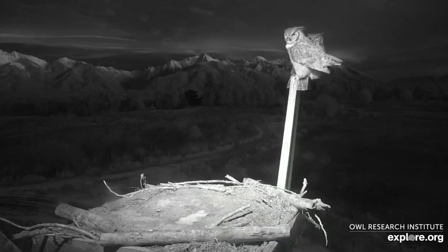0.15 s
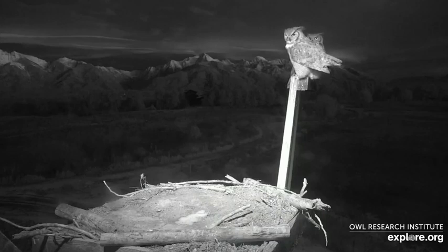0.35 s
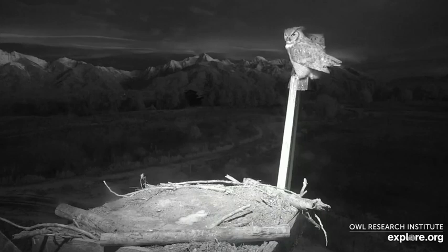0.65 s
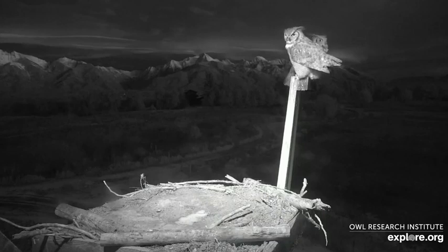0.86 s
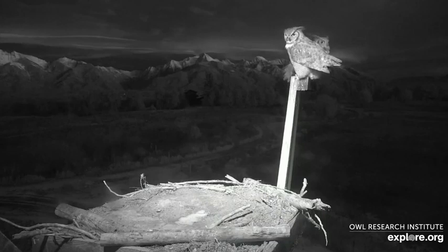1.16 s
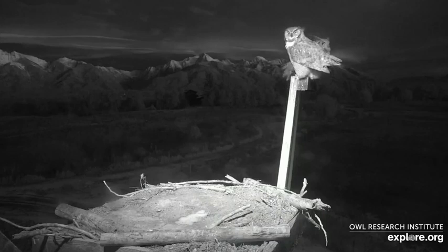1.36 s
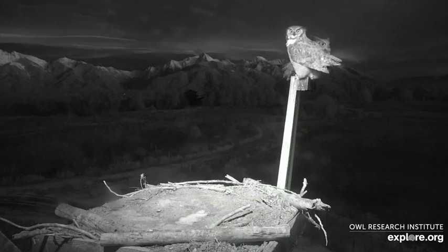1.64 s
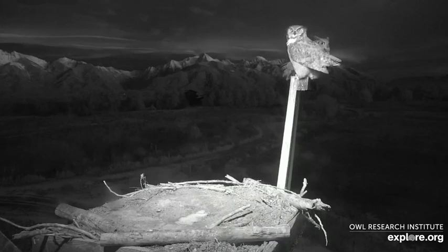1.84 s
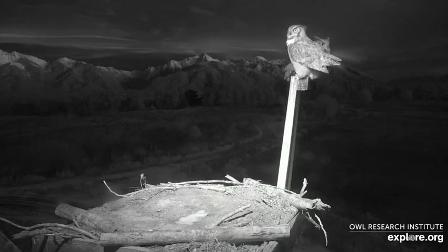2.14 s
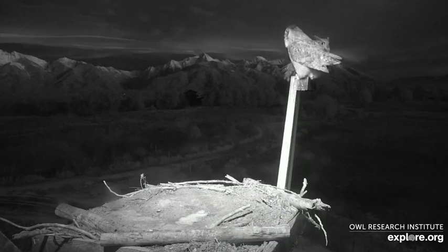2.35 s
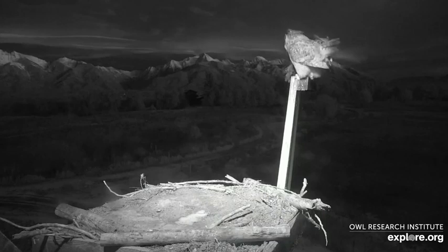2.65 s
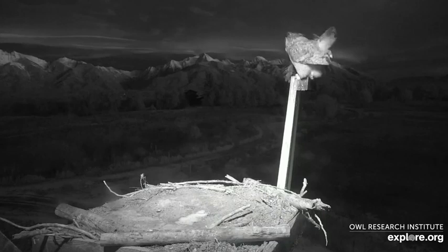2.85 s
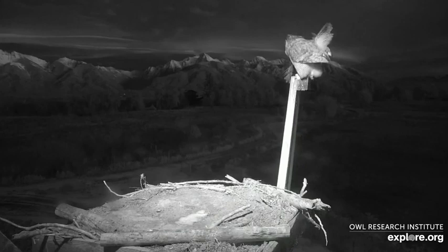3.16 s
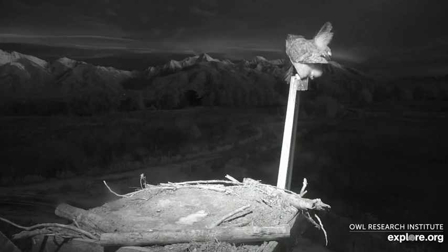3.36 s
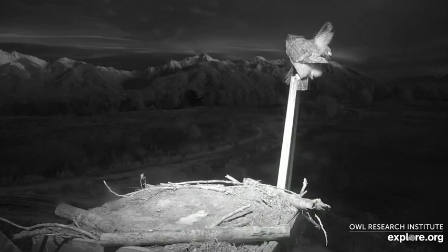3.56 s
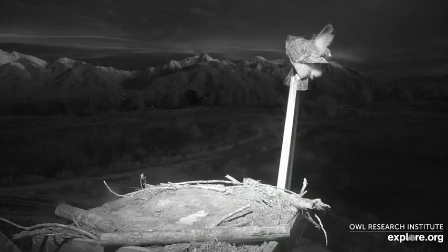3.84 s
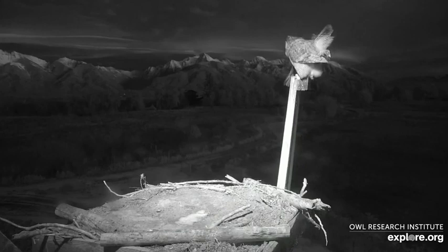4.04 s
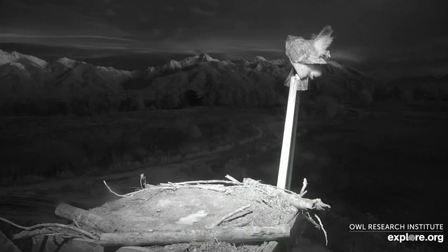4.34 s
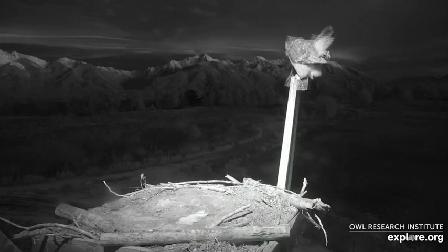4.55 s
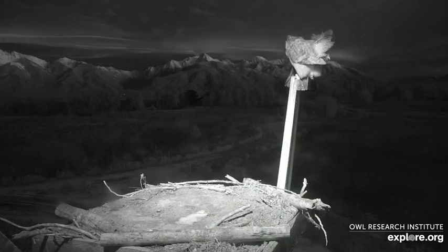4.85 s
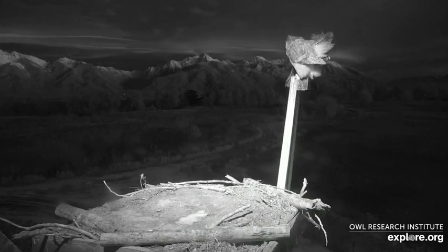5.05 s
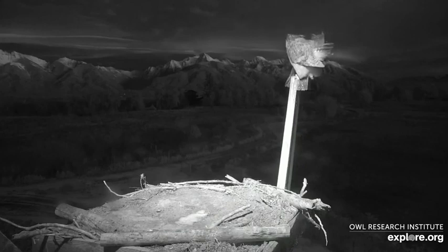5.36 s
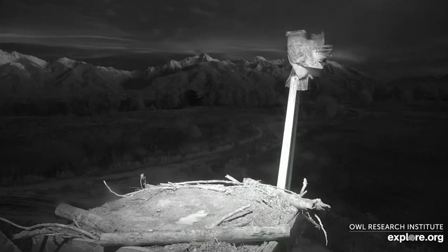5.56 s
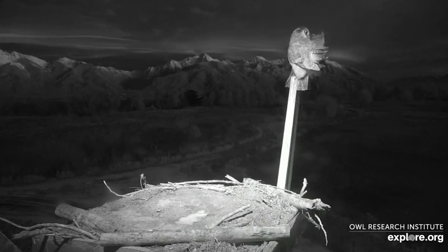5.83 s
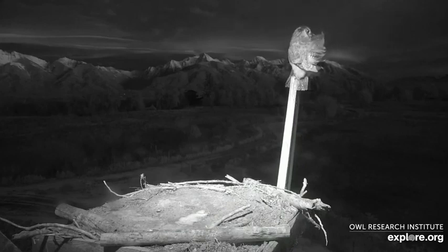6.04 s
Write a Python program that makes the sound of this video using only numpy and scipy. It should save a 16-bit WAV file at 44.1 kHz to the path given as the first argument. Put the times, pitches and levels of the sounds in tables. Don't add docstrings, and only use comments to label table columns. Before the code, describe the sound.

Outdoors in an open valley at dusk, a higher-voiced owl gives a run of smooth, pure hoots, some joined into a stuttering phrase. A lower owl overlaps its ending and answers with longer, spaced hoots. Behind them lie a faint distant engine drone, a thin electric whine and soft hiss. The microphone is fairly near, with little echo.

```python
import sys
import numpy as np
from scipy import signal
from scipy.io import wavfile
from scipy.ndimage import uniform_filter1d

SR = 44100
rng = np.random.default_rng(int(sys.argv[2]) if len(sys.argv) > 2 else 0)


def bounce(signal):
    frames = np.transpose(np.atleast_2d(signal))
    limited = np.clip(frames, -1, 1)
    pcm = np.round(limited * 32767).astype(np.int16)
    wavfile.write(sys.argv[1], SR, pcm)


def gain_from_db(level_db):
    decades = np.asarray(level_db, float) / 20
    return 10 ** decades


N = 273287


def evened(x):
    return x / np.sqrt(np.mean(x ** 2) + 1e-20)


def slow(count, size):
    return evened(uniform_filter1d(uniform_filter1d(rng.standard_normal(count), size), size))


def swelling(db, swells):
    t = np.arange(N) / SR
    return gain_from_db(db + sum(d * np.exp(-((t - middle) / half_width) ** 2) for middle, half_width, d in swells))


def wavering(hz, width, steady):
    r = np.exp(-np.pi * width / SR)
    drift = signal.lfilter([(1 - r) ** 2], np.poly([r, r]), rng.standard_normal((2, N)))
    drift = (drift[0] + 1j * drift[1]) / np.sqrt(np.mean(drift ** 2) * 2)
    carrier = np.exp(2j * np.pi * np.cumsum(hz * np.ones(N)) / SR)
    return evened(((steady + drift) * carrier).real)


def valley():
    # (frequency [Hz], level [dB per Hz])
    wash_spectrum = [(25, -31.5), (48, -27), (66, -11.5), (187, -8.5), (431, -8.5), (560, -7.5), (900, -15),
                     (1150, -26.5), (2720, -34), (2790, -38), (4180, -43.5), (4800, -39.5), (12200, -43),
                     (15600, -41.5)]
    frames, hz = N // 512 + 5, np.fft.rfftfreq(2048, 1 / SR)
    real, imaginary, patches = rng.standard_normal((frames, 1025, 3)).T
    patches = evened(uniform_filter1d(uniform_filter1d(patches, 14, 0), 8, 1))
    f, shape_db = np.transpose(wash_spectrum)
    shape_db = np.interp(np.log(hz + 1), np.log(f), shape_db)[:, None]
    outdoor = (1 / (1 + (hz / 2500) ** 4))[:, None]
    spectra = (real + 1j * imaginary) * gain_from_db(shape_db + outdoor * 1.3 * patches)
    specks = rng.random((frames // 3 + 1, 103)).T < 0.015
    specks = np.repeat(np.repeat(specks, 10, 0), 3, 1)[:1025, :frames]
    top = hz > 12750
    spectra[top] *= gain_from_db(-14 + 15 * specks[top])
    return gain_from_db(-60) * evened(signal.istft(spectra, nperseg=2048, noverlap=1536)[1][:N])


def engine():
    # (time [s], firing rate [Hz], level [dB])
    speed = [
        (0, 38.6, -1.5),
        (0.6, 39.01, -1.5),
        (2.8, 38.7, -3),
        (3.599, 39.3, 1),
        (5.1, 40.48, -0.7),
        (5.45, 40.06, 2),
        (5.9, 40.16, -3),
        (6.2, 39.28, -14),
    ]
    # (multiple, level [dB rms], width [Hz])
    orders = [(3, -73.5, 3.4), (5, -74.5, 3.7), (6, -59.5, 1.5)]
    # (middle [s], half width [s], level [dB])
    lowest_swells = [(.7, 0.56, -9.5), (5.42, .22, 9)]
    fourth_swells = [(5.6, .3, -5.5), (6.2, .4, -6.5)]
    drone_swells = [(3.5, 1.1, 9), (4.9, .6, 8)]
    s, *columns = np.transpose(speed)
    hz, db = (np.interp(np.arange(N) / SR, s, c) for c in columns)
    upper = sum(gain_from_db(d) * wavering(k * hz, width, 5 / width) for k, d, width in orders)
    lowest = swelling(-71, lowest_swells) * wavering(2 * hz, 2, 2.3)
    fourth = swelling(-64.5, fourth_swells) * wavering(4 * hz, 4, 2.2)
    drone = swelling(-80, drone_swells) * wavering(150.5, 2, 2)
    return gain_from_db(db) * upper + lowest + fourth + drone


def whine():
    # (frequency [Hz], level [dB rms], width [Hz])
    electric_tones = [(968, -70.5, 3), (1672, -87, 2), (2008, -94, 3), (2342, -89, 2), (2417, -90, 2),
                      (880, -82, 6)]
    # (middle [s], half width [s], level [dB])
    whine_swells = [(1, 0.66, 3.5), (3.1, 0.46, 3.2), (4.8, .6, 4.2)]
    tones = sum(gain_from_db(db) * wavering(hz, width, 2.5) for hz, db, width in electric_tones)
    return tones * swelling(-4, whine_swells)


def breath(pushes, rise_bend, fall_bend, full_hz, full_db, db_per_hz, silent_hz):
    blend_hz, knee_hz = 5.1, 2.4
    t, total = np.arange(N) / SR, np.exp(silent_hz / 2 / blend_hz)
    for s, hold, top_hz, rise, fall in pushes:
        early = (np.maximum(s - t, 0) / rise) ** rise_bend
        late = (np.maximum(t - s - hold, 0) / fall) ** fall_bend
        slack = early * (1 + 1.3 * early ** 2) + late
        total = total + np.exp(top_hz * (1 - np.minimum(slack, 1)) / blend_hz)
    hz = blend_hz * np.log(total)
    db = full_db - db_per_hz * knee_hz * np.logaddexp(0, (full_hz - hz) / knee_hz)
    climb = uniform_filter1d(np.maximum(np.gradient(hz) * SR, 0), size=300)
    db = db - 0.0002 * climb
    return hz, db, np.clip((hz - silent_hz) / 40, 0, 1)


def hoots(pushes, law, tones, full_db, octave_db, knee_db, buzz_db):
    # (frequency [Hz], width [Hz], lift [dB])
    resonances = [(4090, 22, 12), (4150, 450, 7), (8100, 600, 8), (9900, 500, 6)]
    hz, db, gate = breath(pushes, *law)
    turn = 2 * np.pi * np.cumsum(hz * (1 + 0.0012 * slow(N, size=400))) / SR
    falling = uniform_filter1d(np.clip(-np.gradient(hz) * SR / 600, 0, 1), 900)
    wander_db, sounding = 2.5 * slow(N, size=1500), gate > 0
    hz, db, turn, falling = hz[sounding], db[sounding], turn[sounding], falling[sounding]
    voice = gain_from_db(db) * np.cos(turn)
    slack_db = 3 * np.logaddexp(0, (knee_db - db) / 3)
    thinning_db = 0.056 * np.maximum(hz - 355, 0)
    voice += gain_from_db(octave_db - (1.02 - 0.5 * falling) * slack_db - thinning_db) * np.cos(2 * turn)
    third = gain_from_db(-63 + np.minimum(db - knee_db + 8, 0)) * falling * (hz < 310)
    voice += third * np.cos(3 * turn)
    for multiple, tone_db, growth in tones:
        lift_db = np.minimum(growth * (db - full_db), 7) - np.maximum(knee_db - 12 - db, 0)
        voice += gain_from_db(tone_db + lift_db) * np.cos(multiple * turn)
    for multiple in range(8, 34):
        lift_db = sum(d / (1 + ((multiple * hz - f) / width) ** 2) for f, width, d in resonances)
        own_db = np.roll(wander_db, multiple * 7000)[sounding]
        level_db = buzz_db + 2.6 * (db - full_db) + lift_db + own_db
        voice += gain_from_db(level_db) * np.cos(multiple * turn + multiple ** 2)
    out = np.zeros(N)
    out[sounding] = np.sqrt(2) * voice * gate[sounding]
    return out


def high_owl():
    # (top reached [s], hold [s], top pitch [Hz], rise [s], fall [s])
    high_pushes = [(0.756, 0.001, 353, 0.087, 0.15), (0.812, 0.001, 260, 0.093, 0.128),
                   (1.138, 0.006, 360, 0.089, 0.14), (1.353, 0.001, 369.2, 0.099, 0.134),
                   (1.503, 0.001, 376, 0.105, 0.145), (1.588, 0.001, 356, 0.13, 0.15),
                   (1.645, 0.001, 385.5, 0.14, 0.125), (1.684, 0.001, 347, 0.1, 0.059),
                   (2.133, 0.00089, 367.5, 0.114, 0.296), (2.289, 0.001, 372.8, 0.303, 0.145),
                   (2.316, 0.002, 363.3, 0.061, 0.109), (2.621, 0.014, 372.1, 0.13, 0.199),
                   (2.685, 0.006, 360, 0.132, 0.126)]
    # (rise curvature, fall curvature, pitch of full voice [Hz],
    # full voice [dB], loss below it [dB per Hz], silent under [Hz])
    high_law = (2.94, 1.98, 374.5, -17.3, .205, 130)
    # (multiple, level [dB rms], growth [dB per dB of effort])
    high_tones = [(3, -73, 2), (4, -68, .9), (5, -69, 1.8), (6, -77, 1.8), (7, -81, 2.5)]
    return hoots(high_pushes, high_law, high_tones, full_db=-17.5, octave_db=-40, knee_db=-27.5, buzz_db=-96.5)


def low_owl():
    # (top reached [s], hold [s], top pitch [Hz], rise [s], fall [s])
    low_pushes = [
        (2.633, 0.0, 307.3, 0.096, 0.115),
        (2.964, 0.114, 306.7, 0.1, 0.11),
        (3.09, 0.086, 298.7, 0.29, 0.11),
        (3.917, 0.061, 295.3, 0.123, 0.05),
        (4.01, 0.079, 302.9, 0.247, 0.12),
        (4.143, 0.0, 288.9, 0.11, 0.12),
        (4.622, 0.132, 304, 0.098, 0.176),
        (4.787, 0.034, 275, 0.088, 0.075),
        (5.258, 0.019, 291.8, 0.12, 0.101),
    ]
    # (rise curvature, fall curvature, pitch of full voice [Hz],
    # full voice [dB], loss below it [dB per Hz], silent under [Hz])
    low_law = (2.5, 1.88, 303, -21.1, 0.2352, 135)
    # (multiple, level [dB rms], growth [dB per dB of effort])
    low_tones = [(3, -79, .3), (4, -70, 1.1), (5, -75, 1.0), (6, -81, 1.5), (8, -79, 2), (9, -86, 2)]
    # (middle [s], half width [s], level [dB])
    turned_away = [(2.631, 0.17, -1), (3.019, 0.122, -1.4)]
    voice = hoots(low_pushes, low_law, low_tones, full_db=-20.5, octave_db=-40, knee_db=-27, buzz_db=-100.5)
    return voice * swelling(0, turned_away)


def surroundings(x):
    # (delay [s], level [dB])
    reflections = [(0.013, -28.5), (.036, -21), (.052, -32.5), (.07, -33.5)]
    taps = np.zeros(SR // 4)
    for s, db in reflections:
        taps[round(s * SR)] = gain_from_db(db)
    t = np.arange(len(taps)) / SR
    sparse = rng.choice([-1.0, 1.0], len(t)) * (rng.random(len(t)) < 0.04)
    tail = sparse * (t > 0.02) * gain_from_db(-60 * t / 0.2)
    taps += gain_from_db(-29) * tail / np.linalg.norm(tail)
    return x + signal.oaconvolve(x, taps)[:N]


def scene():
    background = valley() + engine() + whine()
    return (background + surroundings(high_owl() + low_owl()))[None]


def band_limit(x):
    return signal.sosfilt(signal.butter(12, 15600, fs=SR, output="sos"), x)


def record(dry):
    high_pass = signal.butter(4, 58, "high", fs=SR, output="sos")
    thinned = signal.sosfiltfilt(high_pass, dry, padtype="even", padlen=4000)
    dry = 0.3 * dry + 0.7 * thinned
    switching_hz, mirror_db = 12880, -67
    ripple = wavering(switching_hz, 120, 0.7)
    hiss = np.diff(rng.standard_normal(N + 1))
    hiss = signal.oaconvolve(hiss, signal.firwin(255, 12750, fs=SR), "same")
    loudness = np.sqrt(abs(uniform_filter1d(dry ** 2, 600)))
    mix = dry * (1 + gain_from_db(mirror_db) * ripple) + gain_from_db(-65) * hiss * loudness
    return band_limit(mix)


dry = scene()
out = record(dry)
bounce(out)
```